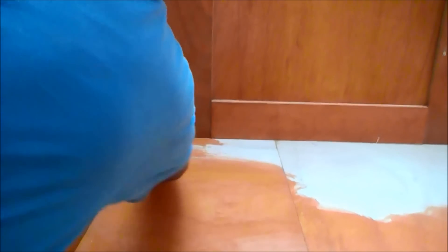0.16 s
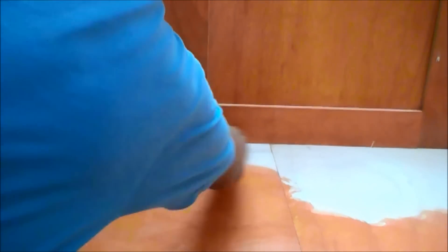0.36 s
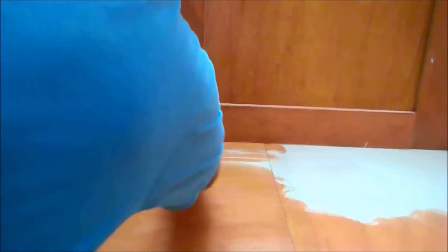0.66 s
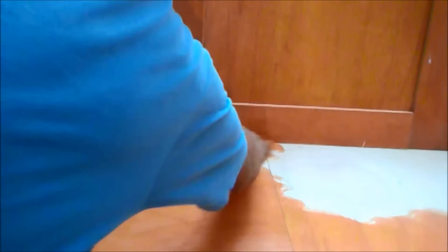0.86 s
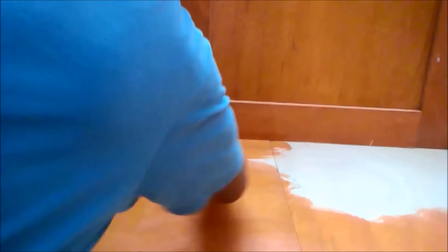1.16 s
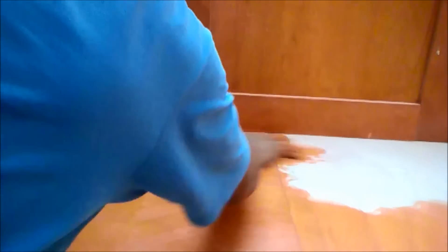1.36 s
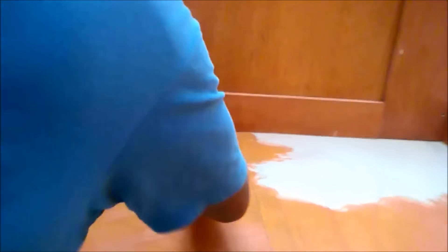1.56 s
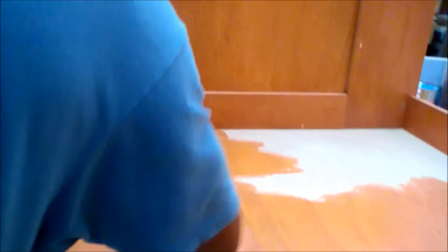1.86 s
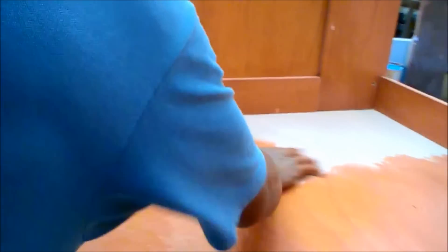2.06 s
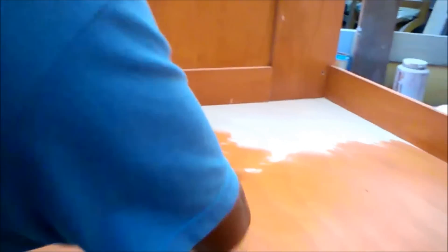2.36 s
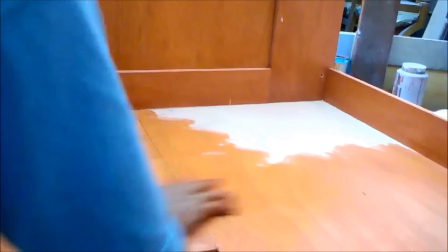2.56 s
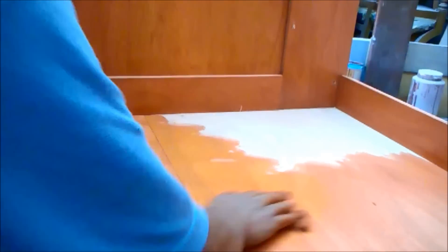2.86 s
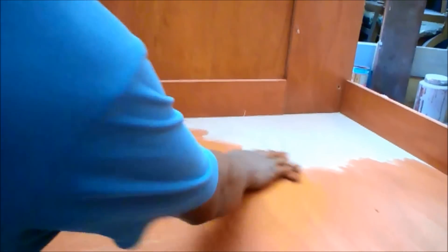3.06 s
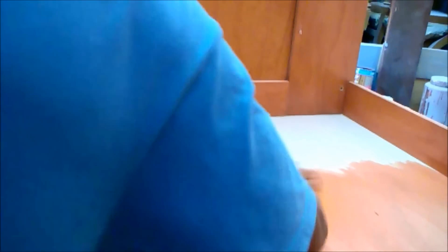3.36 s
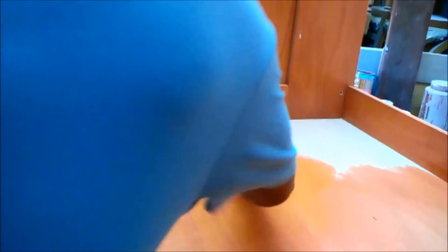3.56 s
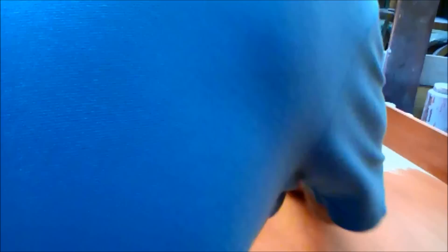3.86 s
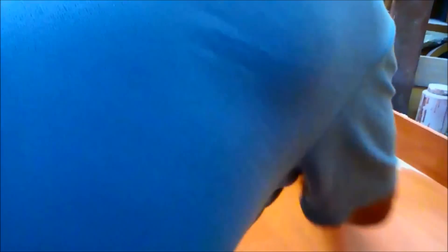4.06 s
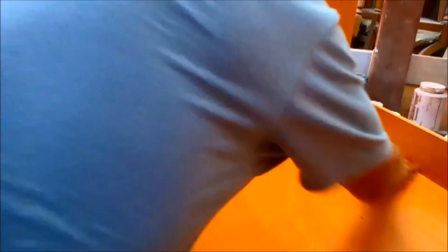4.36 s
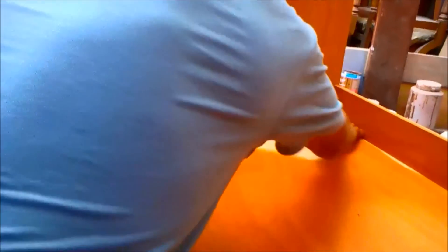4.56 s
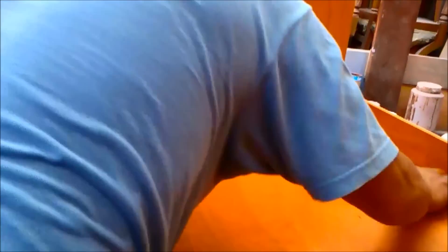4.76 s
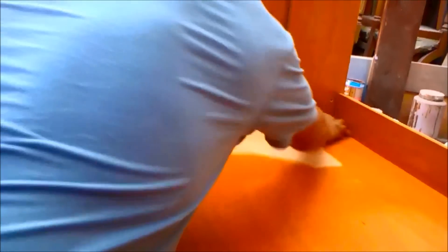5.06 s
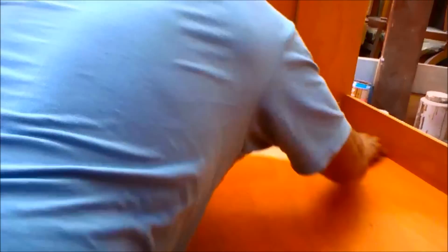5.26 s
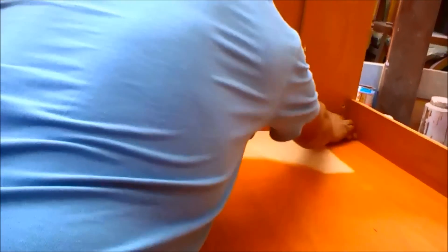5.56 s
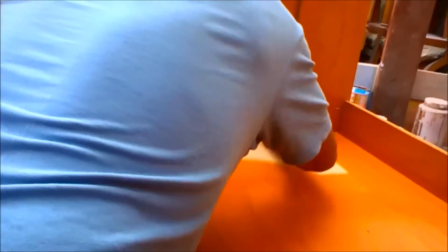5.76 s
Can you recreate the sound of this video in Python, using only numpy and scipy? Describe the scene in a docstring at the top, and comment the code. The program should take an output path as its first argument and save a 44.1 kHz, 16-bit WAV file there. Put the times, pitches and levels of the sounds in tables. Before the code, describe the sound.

Close-up, fast wiping of cloth on wood: dry hiss, gritty rasp and a little hollow scrape with each push. One hard, rattling wooden knock stands far above the rest near the start. Afterwards come small scuffs, a tiny high squeak midway, and dull hand bumps later on. The room is an indoor workshop with a faint short tail and low background rumble.

```python
"""A cloth pad scrubs stain into the wooden panel of a piece of furniture, close by, in a workshop.
Friction makes filtered slip noise: hiss and fizz with every stroke, rasp where the cloth bites,
scrape and panel boom under pressure. Brief squeaks are unsteady sines; scuffs are noise bursts.
Early on a loose board chatters in its frame (damped modes and noise); soft bumps (damped sines) follow.
A diffuse tail answers these single events, over a workshop floor of coloured noise."""
import sys
import numpy as np
from scipy import signal
from scipy.fft import rfft, irfft
from scipy.io import wavfile

SR = 44100
rng = np.random.default_rng(int(sys.argv[2]) if len(sys.argv) > 2 else 0)


def master(y):
    """Save y as 16-bit WAV."""
    cut = np.clip(np.atleast_2d(y).T, -1, 1)
    pcm = np.round(cut * 32767)  # scale
    wavfile.write(sys.argv[1], SR, pcm.astype(np.int16))


N = 260631
T = np.arange(N) / SR  # time axis [s]

# All spectra below give only a shape: the noise is brought to rms 1 after colouring.
# Pushes or pulls of the pad, the hand leaning in once during each; nominal voice levels:
# (start [s], length [s], lean peak after start [s], lean half length [s],
#  hiss [dB], rasp [dB], scrape of the wood [dB], fizz [dB])
PAD_STROKES = [ (-.045, 0.19, 0.13, 0.036, -45, -53, -50.5, -62),
               (0.198, 0.16, 0.063, 0.032, -43, -48, -51.5, -58),
               (0.411, .26, 0.23, 0.029, -47, -48, -59, -62),
               (.71, 0.2, 0.068, 0.038, -40, -46.5, -46, -59.5),
               (.965, 0.22, 0.083, .06, -47, -52, -54, -59.5),
               (1.134, 0.19, .13, 0.099, -46, -55, -67, -56),
               (1.319, 0.2, 0.15, .028, -41, -43.5, -56, -55.5),
               (1.505, .21, .038, .04, -40, -45, -60, -54),
               (1.72, 0.22, 0.13, 0.04, -41.5, -46, -57.5, -53),
               (1.922, 0.18, 0.081, 0.026, -39.5, -48, -52.5, -51),
               (2.147, 0.19, 0.1, 0.058, -42, -46, -56, -52),
               (2.328, 0.15, 0.12, .022, -40, -50, -46.5, -51),
               (2.508, .17, 0.084, 0.022, -37.5, -36, -52, -50.5),
               (2.66, .22, 0.12, .039, -41, -51, -54, -52),
               (2.926, 0.25, 0.12, .039, -42.5, -43.5, -54, -52.5),
               (3.123, .15, 0.045, .016, -42, -60, -55.5, -51),
               (3.242, 0.25, 0.057, 0.091, -42, -47, -61, -54),
               (3.467, .22, 0.046, 0.072, -39.5, -45.5, -59.5, -50),
               (3.67, .21, 0.045, .04, -44.5, -56, -72, -56),
               (3.926, .27, .11, 0.054, -46, -61, -69, -56.5),
               (4.23, 0.15, 0.035, .035, -50.5, -63, -68, -66),
               (4.341, 0.23, 0.082, 0.06, -44.5, -58, -60.5, -56),
               (4.555, 0.19, 0.13, 0.043, -44.5, -54, -55, -55),
               (4.782, 0.22, 0.15, 0.027, -44, -62, -44.5, -59),
               (5.035, .12, 0.071, 0.025, -42.5, -60, -61, -61),
               (5.134, 0.16, .06, 0.028, -39, -46.5, -48, -56.5),
               (5.323, 0.2, .095, 0.069, -47, -49, -42.5, -64),
               (5.541, 0.17, 0.14, 0.031, -44, -46.5, -51.5, -58),
               (5.793, 0.15, 0.041, .032, -39.5, -45.5, -52, -62)]
# Glide of the pad, which never quite stops at its turns: (time [s], level of the lasting hiss [dB])
TURN_GLIDE = [(0, -65), (.4, -63), (.68, -57), (.95, -58), (1.3, -58), (1.7, -52), (2.15, -49), (2.9, -50),
              (3.6, -54), (3.9, -51), (4.25, -58.5), (5.9, -62)]
# Spectrum of the cloth's hiss: (frequency [Hz], density [dB per Hz])
HISS_SPECTRUM = [(900, -37.5), (1700, -12.5), (2050, -10), (2500, -8.5), (3000, -12.5), (3600, -8),
                 (4300, -1), (5200, 0.5), (5800, -2.5), (6500, -12), (7300, -19.5), (9000, -24),
                 (16000, -47.5)]
# Spectrum of the biting cloth's rasp: (frequency [Hz], density [dB per Hz])
RASP_SPECTRUM = [(700, -49), (1300, -3), (2050, 4), (2900, -2), (4000, -4), (6000, -12.5), (8000, -23),
                 (11000, -26), (16000, -17)]
# Spectrum of the cloth's high fizz: (frequency [Hz], density [dB per Hz])
FIZZ_SPECTRUM = [(4000, -39.5), (6500, 3), (8000, 1), (10500, -1.5), (13000, -1), (15500, -5)]
# Spectrum of the scraped wood: (frequency [Hz], density [dB per Hz])
SCRAPE_SPECTRUM = [(100, -18), (300, -0.5), (600, -4), (950, 0), (1400, -2), (2200, -24), (4000, -55.5)]
# Spectrum of the whole panel flexing: (frequency [Hz], density [dB per Hz])
BOOM_SPECTRUM = [(60, -31), (150, -6), (220, -1.5), (330, -5), (480, -9), (680, 3.5), (900, -6.5),
                 (1500, -35.5), (4000, -51.5)]
# Spectrum of the workshop floor: (frequency [Hz], density [dB per Hz])
SHOP_SPECTRUM = [(20, -18), (32, -9), (52, 6), (80, 0.5), (150, 5.5), (260, -2.5), (500, -10), (900, -10),
                 (1200, -13), (2000, -9.5), (3000, -15.5), (4900, -15.5), (7300, -23.5), (11300, -23.5),
                 (14800, -15.5), (16000, -17)]
# Squeaks of the wet pad: (middle [s], level [dB], mean pitch [Hz], half length [s])
PAD_SQUEAKS = [(0.014, -46, 888, 0.049), (0.023, -47, 1060, 0.052), (0.52, -48, 820, 0.009),
               (0.845, -48, 883, 0.019), (3.165, -38, 4000, 0.012), (5.855, -45, 948, 0.0084)]
# Decay of the workshop's tail: (frequency [Hz], t60 [s])
ROOM_T60 = [(100, 0.39), (300, 0.64), (800, 0.41), (2000, 0.73), (8000, 0.13)]
# Main modes of the loose board: (frequency [Hz], level at the end of the build-up [dB], t60 [s])
BOARD_MODES = [(153.6, -22, 0.3), (302.6, -24.5, 0.13), (305.5, -22.5, 0.27), (364, -47, 0.39),
               (444.6, -24.5, 0.37), (519, -30, 0.41), (573, -39, 0.29), (644, -19.5, 0.16),
               (681, -16, 0.18), (740, -34, 0.29), (766, -25.5, 0.35), (840, -25, 0.14), (855.6, -16, 0.16),
               (883.6, -18, 0.11), (964, -16, 0.11), (1023, -41, 0.42), (1080, -42, 0.3), (1148, -27, 0.33),
               (1317, -28, 0.19), (1344, -31, 0.28), (1465, -41.5, 0.37), (1650, -47, .24),
               (1700, -37, 0.12), (1800, -64, 0.23)]
# Spectrum of the board's crowded small modes: (frequency [Hz], density [dB per Hz])
CROWDED_SPECTRUM = [(20, -44), (40, -25), (65, -24.5), (100, -33), (135, -40), (190, -10), (245, -16),
                    (300, -6), (450, 1.5), (560, -1.5), (680, 4), (800, 3.5), (1200, -7.5), (1800, -9.5),
                    (2400, -17.5), (3000, -22.5), (4800, -18), (7000, -33), (15000, -52)]
# Decay of those crowded modes: (frequency [Hz], t60 [s])
CROWDED_T60 = [(200, 0.18), (900, 0.081), (1600, 0.2), (2500, 0.072), (4500, 0.0348), (12000, 0.048)]
# Strikes of the board on its frame: (time [s], nominal level [dB])
FRAME_CONTACTS = [(0.2969, -30), (0.2999, -14.5), (0.3094, -30), (.3160, -16.5), (0.3223, -23.5),
                  (0.338, -33), (.367, -34), (0.398, -38)]
# Soft bumps of the hand: (time [s], level [dB], pitch [Hz], t60 [s], level of the wood's short knock [dB])
HAND_BUMPS = [(0.756, -44, 264, 0.13, -54), (3.1467, -35, 480, 0.054, -55), (3.163, -41, 397, 0.1, -46),
              (3.172, -40.5, 378, 0.11, -52), (3.662, -42.5, 99, 0.35, -70),
              (4.3305, -30.5, 228.3, 0.14, -38), (4.362, -36, 286, 0.083, -40.5),
              (4.89, -39.5, 153, 0.25, -41.5), (5.355, -39, 149.5, 0.24, -45),
              (5.689, -44.5, 151, 0.32, -50)]
# Panel modes rung by a bump: (frequency [Hz], level relative to that knock [dB], t60 [s])
PANEL_MODES = [(440, -2, 0.074), (552, -5, 0.096), (633, -1, .035), (807, -8.5, 0.053), (970, -12, .04),
               (1346, -11.5, 0.15)]
# Catches of the cloth that tear loose: (peak [s], level [dB], rise [s], t60 [s])
CLOTH_SCUFFS = [(1.005, -44, 0.0078, 0.2), (1.336, -40, .0035, 0.26), (1.534, -48, .004, .05),
                (2.017, -39, 0.024, 0.14), (2.238, -42.5, .016, .11), (2.435, -39, 0.022, 0.18),
                (2.59, -43, .009, .047), (2.789, -40.5, 0.02, 0.1), (3.481, -41, 0.067, .25),
                (4.906, -38, 0.015, 0.11), (5.211, -43, 0.0059, 0.11), (5.336, -38.5, 0.0047, 0.23),
                (5.409, -41, .011, 0.25)]
# Spectrum of those scuffs: (frequency [Hz], density [dB per Hz])
SCUFF_SPECTRUM = [(150, -30), (400, -7), (550, -7), (850, 2), (1400, 8), (2100, 6.5), (3000, -2), (5000, 1),
                  (7000, -12), (15000, -50)]

# Share of each voice's amplitude left while the hand is not leaning in
HISS_LIGHT, RASP_LIGHT, SCRAPE_LIGHT, FIZZ_LIGHT = 0.67, 0.25, 0.28, 0.85
# Power of the pad's speed (a half sine from turn to turn) that each voice follows; scrape uses the rasp's
HISS_ARCH, RASP_ARCH, FIZZ_ARCH = 0.43, 0.4, 0.61
GLIDE_RASP_DB, GLIDE_SCRAPE_DB, GLIDE_FIZZ_DB = -8, -16.5, -14.5  # relative to the gliding hiss
BOOM_PIVOT_DB, BOOM_GROWTH = -41.5, 1.65  # level where boom equals nominal scrape; boom dB per scrape dB
SHOP_DB, SHOP_SWELL_DB = -51.5, 0.5  # mean level and rms wander of the floor
ROOM_DB = -20.5  # gain of the diffuse tail
EDGE_HZ = 15800  # upper band edge


def amp(db):
    """Logarithmic level: 20 dB is a tenfold amplitude."""
    return 10 ** (np.asarray(db) / 20)


def unit(x):
    """Normalisation: scales x to rms 1."""
    return x / np.sqrt(np.mean(x ** 2) + 1e-20)


def read(points, hz):
    """Interpolation: reads a table on a log-frequency axis."""
    f, value = np.transpose(points)
    return np.interp(np.log(hz + 1), np.log(f + 1), value)


def colour(x, spectrum):
    """Linear filtering: weights the spectrum of x by a table, then sets rms 1."""
    gain = amp(read(spectrum, np.fft.rfftfreq(len(x), 1 / SR)))
    return unit(irfft(rfft(x) * gain, len(x)))


def wander(hz, size=N):
    """Low-passed noise: slow chance of rms 1, up to about hz."""
    f = np.fft.rfftfreq(size, 1 / SR)
    return unit(irfft(rfft(rng.standard_normal(size)) / (1 + (f / hz) ** 2), size))


def fade(x, t60s):
    """Frequency-dependent damping: each band of x dies at its own speed."""
    hz, t, bands = signal.stft(x, SR, nperseg=256)
    decay = amp(-60 * t / read(t60s, hz)[:, None])
    return signal.istft(bands * decay, SR, nperseg=256)[1][:len(x)]


def place(s, sound):
    """Time shift: sets a short sound into the scene, starting at s."""
    return np.interp(T - s, T[:len(sound)], sound, left=0, right=0)


def fibres(per_s, spread_db, share):
    """Shot noise: countless tiny slips blur into noise; larger snags stand out as clicks."""
    size_db = spread_db * np.minimum(rng.exponential(1, N), 4)
    snags = (rng.random(N) < per_s / SR) * rng.choice([-1, 1], N) * amp(size_db)
    return unit(rng.standard_normal(N) + share * unit(snags))


def rubbing(levels_db, light, arch, glide_db=0):
    """Speed and load set friction level [dB]: strokes speed up, swell at the lean and slow for the turn."""
    power = amp(np.interp(T, *np.transpose(TURN_GLIDE)) + glide_db) ** 2
    for (start, length, lean_after, lean_half, *_), db in zip(PAD_STROKES, levels_db):
        during = (T > start) & (T < start + length)
        t = T[during] - start
        speed = abs(np.sin(np.pi * t / length))
        lean = np.exp(-((t - lean_after) / lean_half) ** 2)
        load = light + (1 - light) * lean
        power[during] += (amp(db) * speed ** arch * load) ** 2
    return 10 * np.log10(power)


def pad():
    """Stick-slip friction of cloth on wet wood: uneven grip shakes hiss, rasp and panel together."""
    hiss_db, rasp_db, scrape_db, fizz_db = np.transpose(PAD_STROKES)[4:]
    grip = wander(hz=55)

    hiss_level = rubbing(hiss_db, HISS_LIGHT, HISS_ARCH) + 0.45
    hiss_level = hiss_level + 0.5 * grip + 0.5 * wander(hz=90)
    hiss = colour(fibres(per_s=2500, spread_db=1.0, share=0.58), HISS_SPECTRUM) * amp(hiss_level)

    rasp_level = rubbing(rasp_db, RASP_LIGHT, RASP_ARCH, GLIDE_RASP_DB) + 1.0 * grip
    rasp = colour(fibres(per_s=900, spread_db=5.0, share=0.33), RASP_SPECTRUM) * amp(rasp_level)

    fizz_level = rubbing(fizz_db, FIZZ_LIGHT, FIZZ_ARCH, GLIDE_FIZZ_DB) + 0.5 * wander(hz=30)
    fizz = colour(fibres(per_s=1600, spread_db=0, share=0.6), FIZZ_SPECTRUM) * amp(fizz_level)

    pressure_db = rubbing(scrape_db, SCRAPE_LIGHT, RASP_ARCH, GLIDE_SCRAPE_DB)
    scrape_level = pressure_db - 1.5 + 0.75 * grip
    scrape = colour(fibres(per_s=400, spread_db=2.5, share=0.92), SCRAPE_SPECTRUM) * amp(scrape_level)

    # only hard pushes flex the whole panel, so its boom grows faster than the scrape
    boom_level = BOOM_GROWTH * (pressure_db - BOOM_PIVOT_DB) + BOOM_PIVOT_DB + 1.3 * grip
    boom = colour(fibres(per_s=180, spread_db=3.5, share=0.45), BOOM_SPECTRUM) * amp(boom_level)
    return hiss + rasp + fizz + scrape + boom


def shop():
    """Stationary coloured noise: the workshop's rumble and faint hiss, swelling only slightly."""
    level_db = SHOP_DB + SHOP_SWELL_DB * wander(hz=0.77)
    return colour(rng.standard_normal(N), SHOP_SPECTRUM) * amp(level_db)


def squeaks():
    """Synchronised stick-slip: for a moment the slips fall into step and give an unsteady tone."""
    out = np.zeros(N)
    for s, db, hz, half in PAD_SQUEAKS:
        turns = np.cumsum(hz * (1 + 0.031 * wander(hz=150))) / SR
        envelope = np.exp(-((T - s) / half) ** 2)
        out += amp(db) * envelope * np.sin(2 * np.pi * turns)
    return out


def room(x):
    """Diffuse reverberation: convolution with a noise tail whose bands decay by ROOM_T60."""
    tail = fade(rng.standard_normal(SR), ROOM_T60) * (1 - np.exp(-T[:SR] / 0.011))
    return signal.fftconvolve(x, tail / np.linalg.norm(tail))[:N]


def knock(build_s=0.019, first_share=0.21, rattle_turns=0.14):
    """Modal resonance: chatter pumps up the board's modes, which ring out; contacts add crowded ones."""
    t, modes = T[:SR], np.zeros(SR)
    build = np.minimum(first_share + t / build_s * (1 - first_share), 1)
    swell = build * (1 - np.exp(-t / 0.0014))
    free = np.maximum(t - build_s, 0)  # time since the build-up ended
    for hz, db, t60 in BOARD_MODES:
        # the shifting seat of the board smears its modes as they die, high ones most
        blur = rattle_turns * np.minimum(t / 0.03, 2) * np.sqrt(hz / 500) * wander(hz=24.7, size=SR)
        modes += amp(db - 60 * free / t60) * np.sin(2 * np.pi * (hz * t + rng.random() + blur))
    # the first contact only grazes; the second starts the ringing
    out = place(FRAME_CONTACTS[1][0], swell * modes)
    for s, db in FRAME_CONTACTS:
        crowd = fade(colour(rng.standard_normal(SR), CROWDED_SPECTRUM), CROWDED_T60)
        crowd = crowd * (1 - np.exp(-t / 0.00012))
        out += place(s, amp(db - 2.5) * crowd)
    return out


def bumps(rough=0.67):
    """Damped oscillation: the padded hand swings the wood unevenly, with a short knock on top."""
    t, out = T[:SR], np.zeros(N)
    onset = 1 - np.exp(-t / 0.00053)
    for s, db, hz, t60, knock_db in HAND_BUMPS:
        unevenness = 1 + rough * wander(hz=0.62 * hz, size=SR)
        swing = amp(db - 60 * t / t60) * np.sin(2 * np.pi * hz * t) * unevenness
        tap = np.zeros(SR)
        for mode_hz, level, decay in PANEL_MODES:
            mode = np.sin(2 * np.pi * (mode_hz * t + rng.random()))
            tap += amp(knock_db + level - 60 * t / decay) * mode
        out += place(s, (swing + tap) * onset)
    return out


def scuffs():
    """Stored strain released: slips build as the cloth drags and die when it breaks free."""
    level = np.zeros(N)
    for s, db, rise, t60 in CLOTH_SCUFFS:
        build = np.exp(-(np.minimum(T - s, 0) / rise) ** 2)
        level += amp(db - 60 * np.maximum(T - s, 0) / t60) * build
    return colour(fibres(per_s=790, spread_db=4, share=0.34), SCUFF_SPECTRUM) * level


def scene():
    """Superposition: the pad up close, with knock, bumps, scuffs and squeaks also stirring the room."""
    hits = knock() + bumps() + scuffs() + squeaks()
    return (pad() + hits + amp(ROOM_DB) * room(hits) + shop())[None]


def record(dry):
    """Band limiting: a linear-phase low-pass filter with its edge at EDGE_HZ."""
    low_pass = signal.firwin(601, EDGE_HZ, window=("kaiser", 8), fs=SR)
    return signal.oaconvolve(dry, low_pass[None], "same")


dry = scene()
out = record(dry)
master(out)
```